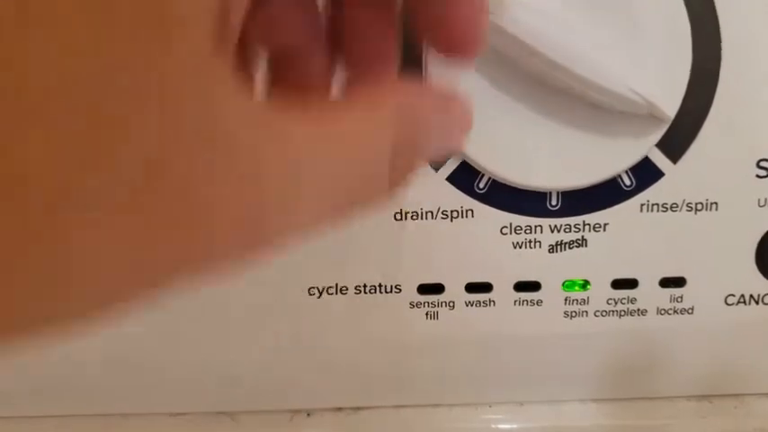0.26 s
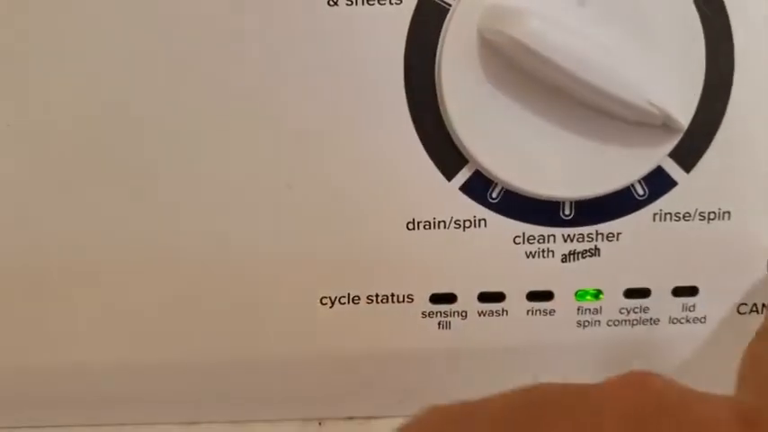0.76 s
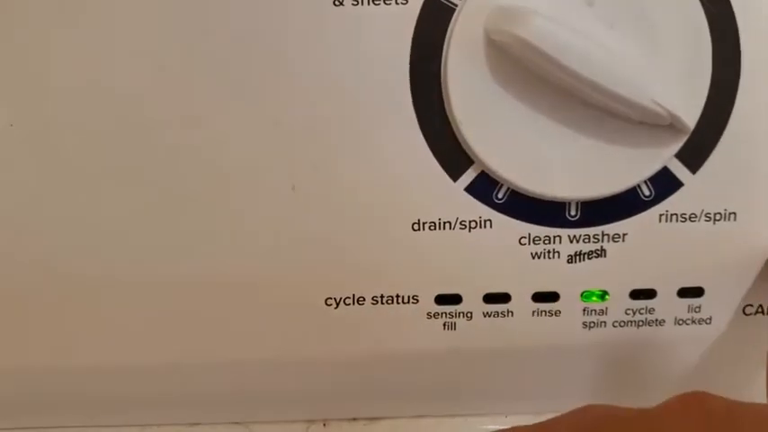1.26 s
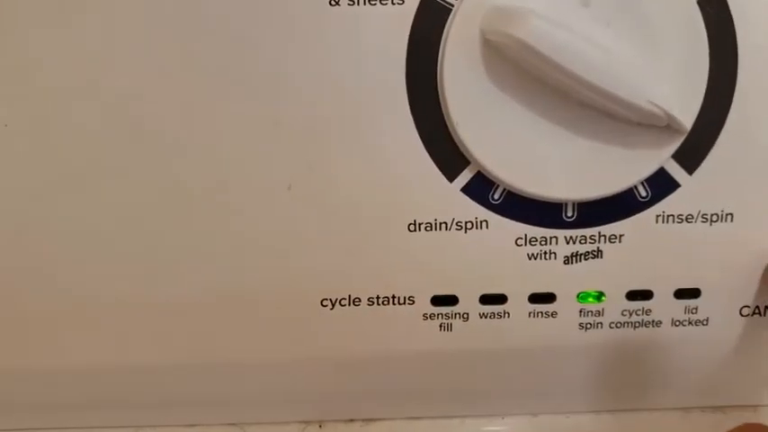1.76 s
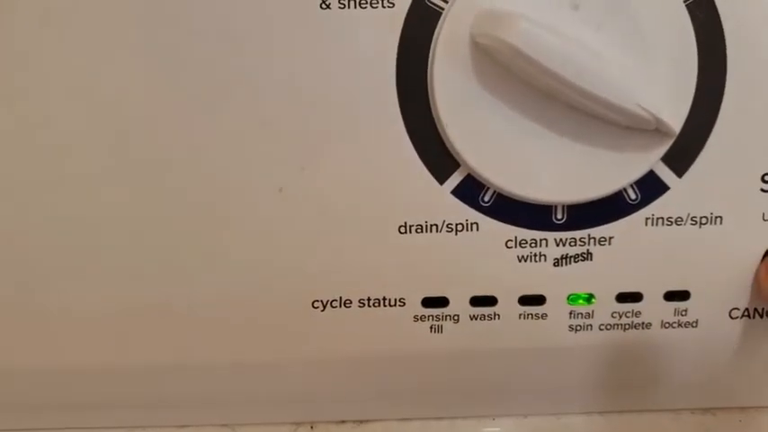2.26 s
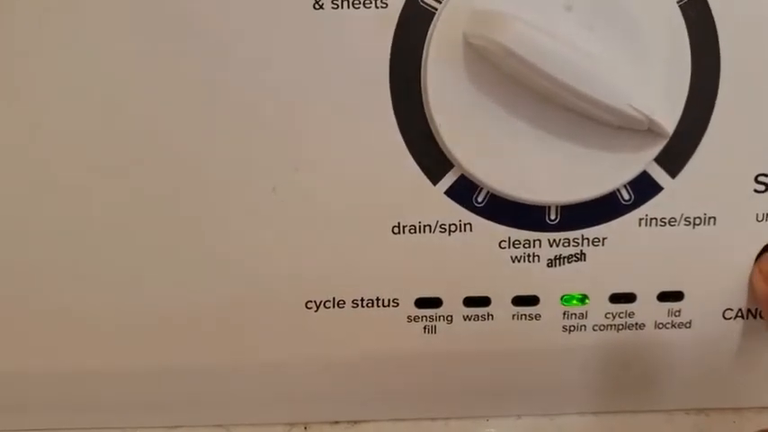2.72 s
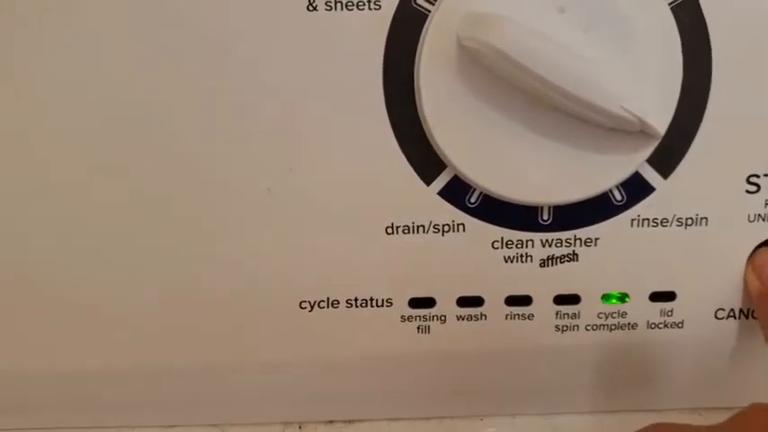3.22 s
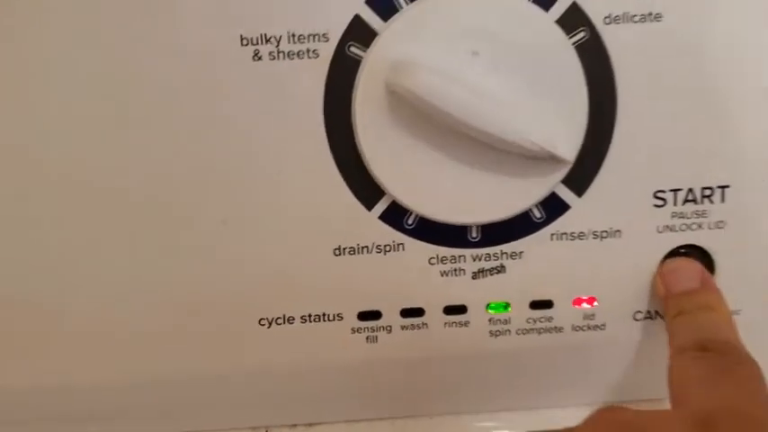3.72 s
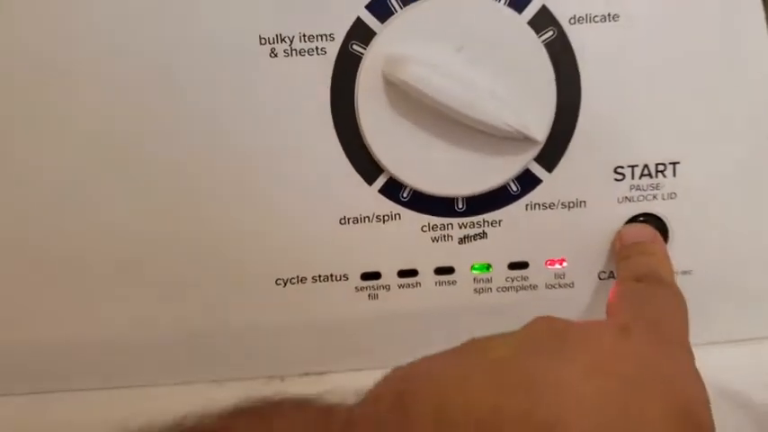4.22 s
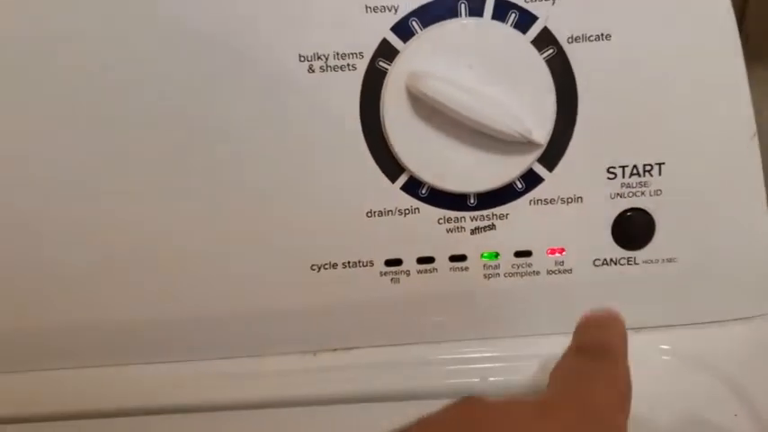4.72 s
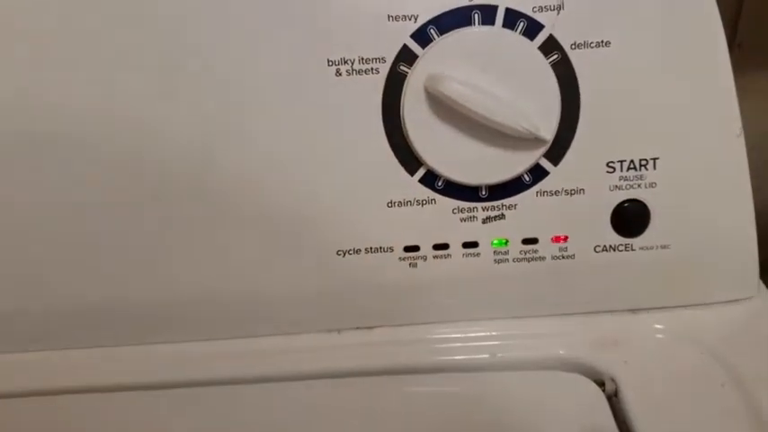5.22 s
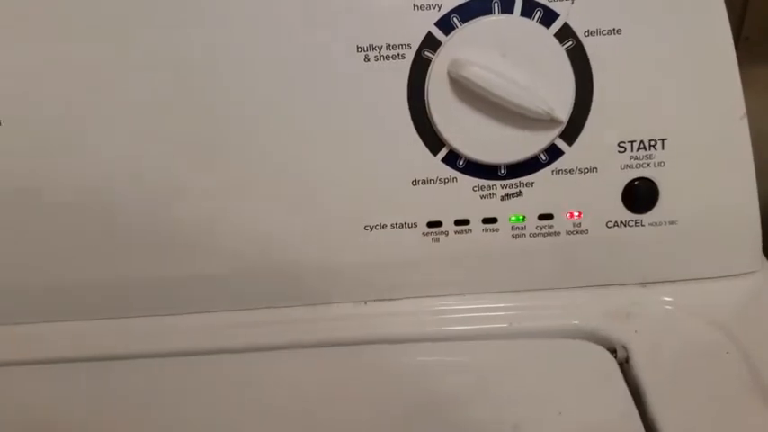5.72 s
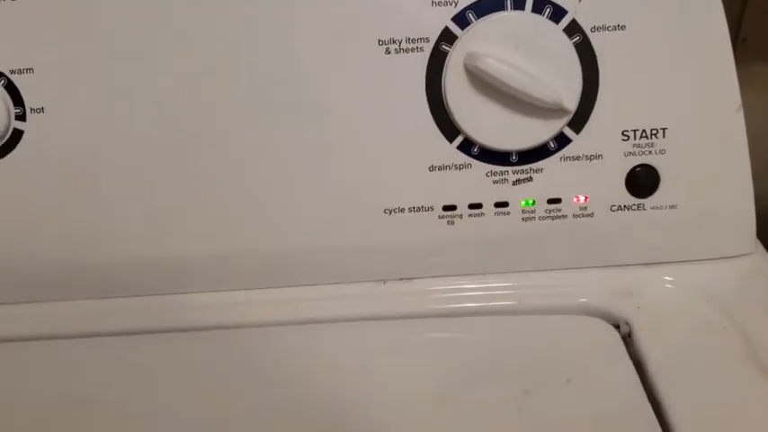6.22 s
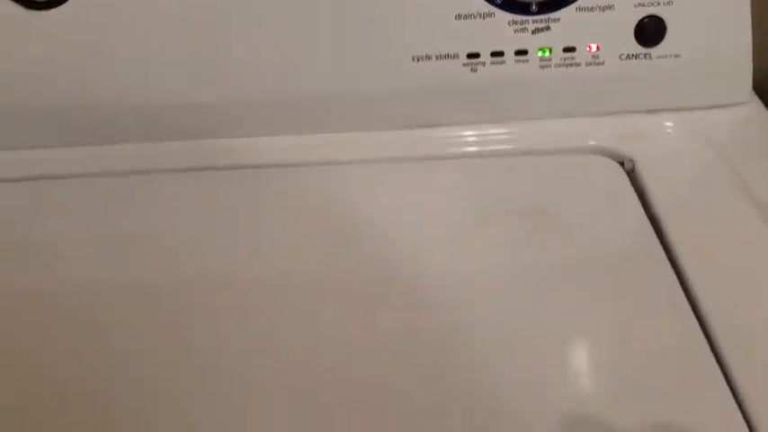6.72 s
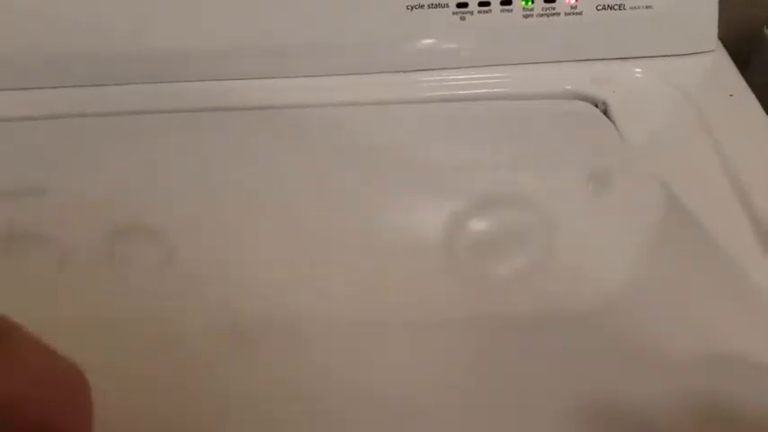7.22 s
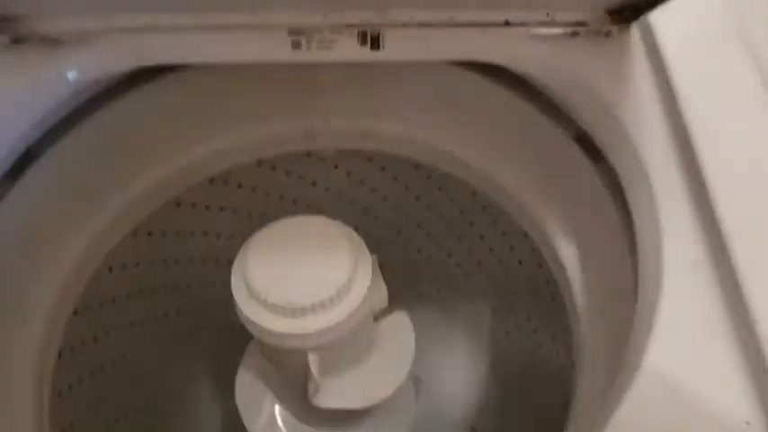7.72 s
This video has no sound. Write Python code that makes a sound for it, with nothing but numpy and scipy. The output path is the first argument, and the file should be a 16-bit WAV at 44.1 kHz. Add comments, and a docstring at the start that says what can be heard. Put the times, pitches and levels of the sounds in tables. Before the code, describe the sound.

A washing machine hums steadily, its lid lock snaps with a hard metallic clack, then water sprays into the steel tub, growing loud and spattering.

```python
"""A top-loading washer in a small hard-walled laundry, heard at the two microphone ports of a handheld phone.
Mains hum, a fan tone and a thin whine are sines; air rumble, hiss, soft knocks and swishes are shaped noise.
The lid lock snaps as noise bursts with ringing modes, and the drone sinks a little. Then the inlet valve opens:
water sprays and spits as flickering noise bands and short bursts, the steel tub drums through resonances,
water sloshes as swelling noise and the valve whistles through narrow peaks."""
import sys
import numpy as np
from scipy import signal
from scipy.fft import rfft, irfft, next_fast_len
from scipy.io import wavfile

SR = 44100
rng = np.random.default_rng(int(sys.argv[2]) if len(sys.argv) > 2 else 0)


def persist_wave(psi):
    """Save psi, clipped to +-1, as 16-bit WAV."""
    counts = np.round(np.clip(psi, -1, 1) * 32767).astype(np.int16)
    wavfile.write(sys.argv[1], SR, np.atleast_2d(counts).T)


N = 351477

LEFT_LAG = 14  # samples by which the left port hears the machine later

# Standing waves of the small room: a fine fixed ripple over frequency, another at each port.
ROOM_SIZE, ROOM_T60_S = 32768, 0.12
ROOM_DECAY = np.exp(-np.log(1000) * np.arange(ROOM_SIZE) / SR / ROOM_T60_S)
ROOM = rfft(rng.standard_normal((2, ROOM_SIZE)) * ROOM_DECAY)

# Level of the machine's drone as the phone moves. Each row: time in seconds, level of the hum in dB.
DRONE_LEVEL = [(0, -29.5), (1, -28.5), (2, -29), (3.2, -28), (3.27, -31.5), (3.5, -33.5), (3.85, -31.5),
               (4.3, -34), (4.6, -33.5), (5.06, -34), (5.7, -33), (6.5, -30.5), (7.0, -35.5), (7.33, -32),
               (7.55, -36.5), (7.97, -38.5)]

# The water jet; its first row is when the valve opens. Each row: time in seconds, spray level in dB,
# treble lift of the spray in dB (only its swing about the mean is heard), tub drumming level in dB.
JET = [(4.38, -64, -20, -55), (4.55, -49.5, 4, -51.5), (4.86, -41, 4, -40), (4.95, -47, 7, -52),
       (5.3, -42, 1, -54), (5.4, -46, 7, -40), (5.7, -47, 11.5, -42.5), (6.0, -43.5, 8.5, -32.5),
       (6.35, -44.5, 11.5, -37.5), (6.65, -44.5, 7.5, -35.5), (6.9, -46, 12.5, -33.5), (7.17, -45, 4, -35),
       (7.4, -39.5, 3, -33.5), (7.6, -40, 11, -34.5), (7.75, -37.5, 7, -39.5), (7.97, -39.5, 12, -33.5)]


def from_db(db):
    """Decibels to gain."""
    return 10 ** (np.asarray(db) / 20)


def rms_one(x):
    """Scales to rms 1."""
    return x / np.sqrt(np.mean(x ** 2) + 1e-20)


def in_time(rows):
    """Draws each column of a table as a line over time, one value per sample."""
    s, *columns = np.transpose(rows)
    return [np.interp(np.arange(N) / SR, s, column) for column in columns]


def at_hz(points, hz):
    """Reads a table of (Hz, value) on a log-frequency axis."""
    table_hz, values = np.array(points).T
    return np.interp(np.log(hz), np.log(table_hz), values)


def colour(points):
    """Turns a table of (Hz, dB) into a gain for each frequency."""
    return lambda hz: from_db(at_hz(points, hz))


def hump(centre_hz, octaves):
    """Bell-shaped gain on a log-frequency axis."""
    return lambda hz: np.exp(-0.5 * (np.log2(hz / centre_hz) / octaves) ** 2)


def drift(rate_hz):
    """Smooth random wander of rms 1: noise through two equal low-pass poles, run at every 40th sample."""
    step = 40
    r = np.exp(-2 * np.pi * rate_hz * step / SR)
    settle = 2000
    noise = rng.standard_normal(N // step + settle + 2)
    slow = signal.lfilter([1], [1, -2 * r, r * r], noise)[settle:]
    return np.interp(np.arange(N) / step, np.arange(len(slow)), rms_one(slow))


def room_gain(hz):
    """Direct sound plus the room's resonances, which fade in over the octave above 300 Hz."""
    grid = np.arange(ROOM.shape[1]) * SR / ROOM_SIZE
    share = 0.5 * np.clip(np.log2(hz / 300), 0, 1)
    ripple = np.abs(ROOM) / np.sqrt(np.mean(np.abs(ROOM) ** 2))
    return np.array([1 - share + share * np.interp(hz, grid, r) for r in ripple])


def port_noise(size):
    """Room-tinted noise: a common part, late at the left port, plus a diffuse part of each port's own."""
    # Each row: frequency in Hz, share of the noise power common to both ports (0 to 1).
    likeness = [(25, .97), (60, 0.88), (250, 1), (600, 0.72), (1500, 0.063), (8000, 0.028)]
    padded = next_fast_len(size)
    common, left, right = rfft(rng.standard_normal((3, padded)))
    hz = np.arange(len(common)) * SR / padded + 1
    alike = np.clip(at_hz(likeness, hz), 0, 1)
    late = np.exp(-2j * np.pi * hz * LEFT_LAG / SR)
    shared = np.sqrt(alike) * common * [late, late ** 0]
    diffuse = np.sqrt(1 - alike) * np.array([left, right])
    return irfft((shared + diffuse) * room_gain(hz), padded)[:, :size]


def coloured(x, gain_at):
    """Shapes noise by a gain for each frequency; rms 1."""
    size = x.shape[1]
    padded = next_fast_len(size)
    hz = np.arange(padded // 2 + 1) * SR / padded + 1
    shaped = irfft(rfft(x, padded) * gain_at(hz), padded)
    return rms_one(shaped[:, :size])


def resonance(x, hz, width_hz):
    """Two-pole resonance whose peak gain is about 1."""
    r = np.exp(-np.pi * width_hz / SR)
    poles = [1, -2 * r * np.cos(2 * np.pi * hz / SR), r * r]
    return signal.lfilter([(1 - r * r) / 2, 0, (r * r - 1) / 2], poles, x)


def burst(gain_at, t60, rise_s, bend=1, size=12288):
    """Noise that swells in rise_s and is 60 dB down at t60; bend over 1 holds longer, then falls faster."""
    t = np.arange(size) / SR
    noise = coloured(port_noise(size), gain_at) / 2  # halved, so that peaks come near 1
    return noise * (1 - np.exp(-t / rise_s)) * from_db(-60 * (t / t60) ** bend)


def add(out, s, sound):
    """Mixes a short sound in at time s."""
    at = round(s * SR)
    out[:, at:at + sound.shape[1]] += sound[:, :N - at]


def pan(db):
    """Gains for the two ports, left minus right in dB."""
    return from_db([[db / 2], [-db / 2]])


def tone(hz, phase):
    """A sine of rms 1 at both ports, later at the left."""
    t = (np.arange(N) - np.array([[LEFT_LAG], [0]])) / SR
    return np.sqrt(2) * np.sin(2 * np.pi * hz * t + phase)


def hum():
    """Magnetic hum: a harmonic series on twice the mains frequency."""
    # Each row: multiple of the hum frequency, level in dB re the drone level.
    harmonics = [(1, 0), (2, -14), (3, -30.5), (4, -25.5), (6, -33.5)]
    hum_hz = 119.74
    level_db, = in_time(DRONE_LEVEL)
    series = sum(from_db(db) * tone(k * hum_hz, rng.uniform(0, 2 * np.pi)) for k, db in harmonics)
    return from_db(level_db) * series


def fan():
    """Fan tone: a sine wavering slightly in level and phase, following the drone level."""
    level_db, = in_time(DRONE_LEVEL)
    waver_db = 0.62 * drift(2.8)
    return from_db(level_db - 13.5 + waver_db) * tone(268, 0.44 * drift(0.46))


def rumble():
    """Air rumble: low-weighted noise that takes the whole swing of the drone level."""
    # Each row: frequency in Hz, relative density in dB per Hz.
    rumble_colour = [(13, -44), (22, -28.5), (69, -2), (97, -20), (124, -7), (148, -11.5), (183, -23),
                     (256, -16), (290, -23), (317, -24), (476, -28.5), (538, -35), (714, -30), (1130, -50),
                     (1500, -38), (1950, -66), (3300, -120)]
    level_db, = in_time(DRONE_LEVEL)
    start_db = -35.5
    noise = coloured(port_noise(N), colour(rumble_colour))
    return from_db(start_db + level_db - level_db[0]) * noise


def hiss():
    """Broad hiss: shaped noise that takes about half the swing of the drone level."""
    # Each row: frequency in Hz, relative density in dB per Hz.
    hiss_colour = [(400, -2.5), (700, -6), (970, 1), (1300, -9.5), (1500, -5), (2000, -8.5), (3200, -10.5),
                   (5000, -16), (7700, -18), (9100, -22.5), (12000, -17), (15700, -14)]
    level_db, = in_time(DRONE_LEVEL)
    start_db, follows = -49, 0.51
    noise = coloured(port_noise(N), colour(hiss_colour))
    return from_db(start_db + follows * (level_db - level_db[0])) * noise


def whine():
    """Thin high sine, unsteady in level and phase, that holds its mean level and then fades."""
    fade_start_s, fade_db_per_s = 1.65, 7
    fade_db = fade_db_per_s * np.maximum(np.arange(N) / SR - fade_start_s, 0)
    return from_db(-69.5 - fade_db + 3.4 * drift(6.0)) * tone(3118, 0.38 * drift(4.6))


def swishes():
    """Brief thin swishes: puffs of treble noise."""
    # Each row: start in seconds, peak level in dB (approximate), centre in Hz, width in octaves,
    # t60 in seconds.
    puffs = [(.2, -52.5, 6000, 0.49, 0.28), (1.501, -47.5, 6160, .15, 0.18), (1.5, -52, 12000, 0.22, 0.22),
             (3.682, -47.5, 4700, 0.99, 0.9), (4.118, -46.5, 7900, 1, 0.15)]
    out = np.zeros((2, N))
    for s, db, hz, octaves, t60 in puffs:
        add(out, s, from_db(db) * burst(hump(hz, octaves), t60, rise_s=0.0013, bend=1.8))
    return out


def knocks():
    """Soft knocks: bursts of noise around one centre each, mostly dull."""
    # Each row: start in seconds, peak level in dB (approximate), centre in Hz, width in octaves,
    # t60 in seconds.
    bumps = [(0.625, -39, 800, 0.71, 0.12), (0.933, -35.5, 579, 0.75, 0.26), (1.234, -37, 577, 0.4, 0.14),
             (1.758, -29.5, 560, 0.73, 0.08), (1.818, -34.5, 750, 1, 0.2), (2.383, -35, 953, 0.81, 0.22),
             (2.534, -37, 930, 0.7, 0.32), (2.968, -37.5, 1200, 0.27, 0.17),
             (3.047, -29.5, 1000, 0.61, 0.068), (3.507, -41.5, 1180, 0.45, 0.22),
             (3.789, -34.5, 693, 1, 0.14), (4.13, -36.5, 610, 1, 0.1), (4.331, -35, 724, 0.15, 0.085),
             (4.734, -36, 2350, 0.66, 0.29), (5.885, -31, 900, 0.88, 0.32), (6.852, -23.5, 770, 0.4, 0.18),
             (7.445, -28, 638, 0.33, 0.086), (7.668, -32, 1100, 0.65, 0.066)]
    out = np.zeros((2, N))
    for s, db, hz, octaves, t60 in bumps:
        add(out, s, from_db(db) * burst(hump(hz, octaves), t60, rise_s=0.0029, bend=1.3))
    return out


def lid_lock():
    """A solenoid bolt hits its stop: a broad crack spreading through the sheet metal, and short rings."""
    # Coil tick, bolt and rebound. Each row: start in seconds, peak level in dB (approximate),
    # t60 of the crack in seconds.
    strikes = [(3.224, -28, 0.087), (3.2294, -8, 0.22), (3.283, -16.5, 0.15)]
    # Colour of the crack. Each row: frequency in Hz, relative density in dB per Hz.
    crack_colour = [(210, -39), (350, -23), (445, -8.5), (664, -14), (730, -20), (817, -10), (1380, -8),
                    (1650, -1), (2130, -7.5), (2420, -3.5), (3450, -7.5), (5940, -4.5), (12000, -6.5),
                    (15700, -6.5)]
    # Rings of the metal. Each row: frequency in Hz, level in dB re the strike, t60 in seconds.
    modes = [(700, -29, 0.068), (1215, -20, 0.051), (1604, -21.5, 0.18), (2300, -36, .08),
             (3010, -14, 0.12), (4320, -18.5, 0.2), (5020, -12, 0.05), (5980, -10, .05)]
    out = np.zeros((2, N))
    t = np.arange(8192) / SR
    for s, db, t60 in strikes:
        add(out, s, from_db(db) * burst(colour(crack_colour), t60, rise_s=0.0012, bend=1.29))
        for hz, mode_db, ring_s in modes:
            phase = rng.uniform(0, 2 * np.pi, (2, 1))
            decay = from_db(db + mode_db - 60 * t / ring_s)
            add(out, s, decay * np.sin(2 * np.pi * hz * t + phase))
    return out


def splashes():
    """Small splashes: a gain that jumps at random moments and dies back to 1."""
    step = 32  # samples
    per_s, decay_s, mean_jump = 25, 0.011, 0.43
    count = N // step + 1
    hits = (rng.random(count) < per_s * step / SR) * rng.exponential(1, count)
    dying = signal.lfilter([1], [1, -np.exp(-step / SR / decay_s)], hits)
    return 1 + mean_jump * np.repeat(dying, step)[:N]


def spray():
    """Dense droplets in bands a third of an octave wide that flicker partly together, partly alone."""
    # Each row: frequency in Hz, relative level of the band there in dB.
    spray_colour = [(1000, -34), (1700, 1.5), (2120, -10), (2560, 2), (3960, 1.5), (7710, -0.5),
                    (9060, -12.5), (15100, -14), (16000, -4), (16500, -47)]
    spray_db, treble_db, _ = in_time(JET)
    patchy_db, grain_db, grain = 2.0, 0.5, 64  # grain: samples for each drop size
    drops = from_db(grain_db * np.minimum(rng.exponential(1, N // grain + 1), 5))  # uneven drop sizes
    rough = np.repeat(drops, grain)[:N]
    white = [port_noise(N) * rough, port_noise(N) * rough]  # neighbouring bands use different noise
    together = drift(14)
    edges = 1400 * 2 ** (np.arange(12) * 0.35)
    out = np.zeros((2, N))
    for k, (low, high) in enumerate(zip(edges, edges[1:])):
        hz = np.sqrt(low * high)
        if k % 3 == 0:  # up to three neighbouring bands splash together
            spatter = splashes()
        sos = signal.butter(2, [low, high], "band", fs=SR, output="sos")
        band = signal.sosfilt(sos, white[k % 2])
        treble_share = np.clip(np.log2(hz / 6000), 0, 1)
        lift_db = treble_share * (treble_db - np.mean(treble_db))
        flicker_db = patchy_db * (together / 2 + drift(4.2))
        out += from_db(at_hz(spray_colour, hz) + lift_db + flicker_db) * spatter * band
    return from_db(spray_db) * rms_one(out)


def tub_drumming():
    """The steel tub drummed by the jet: lumpy noise excites its low modes, each filtered twice."""
    # Each row: frequency in Hz, width of the first filter in Hz (the second is twice as wide),
    # filter gain in dB.
    tub_modes = [(149, 13, -7), (229.2, 26, -7), (265.8, 32, 0), (314.3, 10.5, 0.5), (372.5, 37, -13),
                 (439, 40, -22.5), (653, 6.7, -14)]
    tub_db = in_time(JET)[2]
    jet = port_noise(N) * from_db(1.7 * drift(7.4))  # the jet lands in lumps
    tub = 0
    for hz, width_hz, db in tub_modes:
        narrow = resonance(jet, hz, width_hz)
        tub = tub + from_db(db) * resonance(narrow, hz, 2 * width_hz)
    return from_db(tub_db) * pan(2) * rms_one(tub)


def sloshing(noise):
    """Water sloshing in the tub: mid-band noise that swells as the water gathers."""
    # Each row: frequency in Hz, relative density in dB per Hz.
    slosh_colour = [(350, -3), (500, -8.5), (720, -6), (1000, -11), (1300, -12), (1900, -11.5),
                    (2600, -23.5)]

    def gain_at(hz):
        """The slosh colour, cut by 40 dB beyond 1.5 octaves from 950 Hz."""
        outside = np.abs(np.log2(hz / 950)) > 1.5
        return from_db(at_hz(slosh_colour, hz) - 40 * outside)

    open_s, rise_db_per_s = JET[0][0], 4
    swell_db = rise_db_per_s * (np.arange(N) / SR - open_s)
    return from_db(-56.5 + swell_db + 3.04 * drift(12)) * coloured(noise, gain_at)


def echoed(gain_at):
    """Adds to a colour the comb of one near echo off the tub wall, at a random lag."""
    lag_s, strength = rng.uniform(0.000394, 0.001625), 0.54
    return lambda hz: gain_at(hz) * np.abs(1 + strength * np.exp(2j * np.pi * hz * lag_s))


def spits():
    """Trapped air bursts from the inlet: a crack on the steel, a body and a fine top, ragged as drops break up."""
    # Each row: start in seconds, crack level in dB, body centre in Hz, body width in octaves,
    # body level in dB, fine top level in dB, body t60 in seconds. Levels are approximate peaks,
    # those of body and top before the raggedness.
    air_bursts = [(4.4095,-39,7700,1,-37,-32,0.15),(4.481,-42,2970,.5,-55,-39,0.14),(4.536,-48,5770,0.38,-38,-43,0.72),(4.585,-33,3500,0.74,-30.5,-34,0.13),
                  (4.737,-40,2650,.55,-41,-35,0.12),(4.7844,-34,3670,0.59,-36,-28,0.14),(4.812,-38,5000,.55,-32.5,-48,0.5),(4.8562,-38,5460,.5,-36,-34,.3),
                  (4.909,-37,3600,0.52,-35.5,-36,0.48),(4.9423,-26,6560,0.38,-36,-30,.2),(4.973,-36,4160,0.93,-33,-35,0.27),(5.049,-39,2940,.5,-45,-29,0.18),
                  (5.144,-39,5600,.5,-41,-33.5,0.2),(5.215,-43,3240,0.84,-33.5,-37,0.15),(5.29,-38,7300,0.95,-30,-48,.3),(5.382,-41,7850,0.95,-34,-44,.25),
                  (5.523,-25,5960,0.79,-28,-39,0.22),(5.663,-38,7650,.4,-36,-34,0.13),(5.7518,-38,7740,0.21,-37,-32,0.083),(5.934,-36,5900,0.47,-36,-27,0.17),
                  (6.018,-36,4900,0.44,-32,-28,.16),(6.121,-36,5200,.55,-35.5,-28,0.27),(6.1755,-35,5900,0.4,-34,-29,0.1),(6.215,-14.5,5100,0.65,-24,-35,.21),
                  (6.315,-35,7980,0.65,-33,-29,0.15),(6.3493,-32,4550,0.44,-34.5,-33.5,0.14),(6.434,-37,5420,.5,-47,-31,.23),(6.47,-50,6300,0.7,-33.5,-40,0.16),(6.483,-33,3740,0.41,-38,-29,0.19),
                  (6.5505,-30,8190,0.4,-36,-24,0.1),(6.614,-29,3860,0.77,-29,-29,0.16),(6.65,-39,4470,0.95,-32,-34,0.32),(6.69,-36,3750,0.47,-36.5,-31,0.34),
                  (6.74,-35,7510,0.56,-36.5,-33,.18),(6.819,-34,4600,1,-30,-28,0.17),(6.967,-38,8350,.6,-32,-34,0.29),(6.997,-33,6250,.5,-39,-25.5,0.16),
                  (7.0356,-29,2520,0.54,-45,-25,0.13),(7.0645,-33,3620,.43,-32,-25,0.2),(7.0887,-15,7660,0.39,-33,-24,0.14),(7.201,-21,4100,.55,-42,-31,0.21),
                  (7.229,-33,8350,0.67,-33,-28,.15),(7.265,-20,6600,0.52,-34,-23.5,0.17),(7.3088,-29,7000,0.95,-28.5,-27,0.3),(7.367,-30,5330,0.4,-35,-25,0.19),
                  (7.4347,-27,7500,.55,-35,-26,0.4),(7.4455,-26,5250,0.96,-19,-21,0.13),(7.507,-28,7600,0.63,-26,-24.5,0.19),(7.564,-28,7800,0.14,-28,-24,0.14),
                  (7.605,-21,7570,1,-25,-26,0.43),(7.6673,-8,7400,1,-20,-19,0.11),(7.688,-7,6100,0.81,-24,-23,0.1),(7.7255,-6,8300,0.22,-26,-16.5,0.15),
                  (7.763,-19,3760,0.42,-27,-29.5,0.1),(7.793,-26,3180,0.2,-39,-26,0.22),(7.832,-18,8450,0.24,-22.5,-18.5,0.081),(7.87,-28,2680,0.4,-43,-24.5,0.2),
                  (7.898,-26,5000,0.56,-26.5,-28,0.064),(7.939,-30,6000,0.86,-27,-27.5,0.099)]
    top_hz, top_octaves, top_lasts = 14470, 0.42, 0.87  # the fine top dies sooner than the body
    water, cracks = np.zeros((2, 2, N))
    for s, crack_db, hz, octaves, body_db, top_db, t60 in air_bursts:
        body = burst(echoed(hump(hz, octaves)), t60, rise_s=0.00027, bend=1.41)
        add(water, s, from_db(body_db) * body)
        top = burst(hump(top_hz, top_octaves), top_lasts * t60, rise_s=0.00037, bend=1.45, size=8192)
        add(water, s, from_db(top_db) * top)
        crack_hz = hz if body_db > top_db else top_hz  # coloured like the stronger part
        crack = burst(hump(crack_hz, 0.12), t60=0.018, rise_s=0.00021, size=4096)
        add(cracks, s, from_db(crack_db) * crack)
    return water * from_db(1.08 * drift(90)) + cracks


def valve_whistle(noise):
    """The valve whistles: noise through narrow resonances, each filtered twice, faded in and out."""
    # Frequencies of the resonances in Hz.
    valve_hz = (1612, 1480, 2350)
    # One row for each frequency: width of each filter in Hz, filter gain in dB.
    valve_peaks = [(22, 9), (30, 5), (60, -28)]
    # Each row: start in seconds, end in seconds, level in dB.
    whistles = [(4.62, 5.56, -57), (7.66, 7.9, -51)]
    t, edge_s = np.arange(N) / SR, 0.017
    valve = 0
    for hz, (width_hz, db) in zip(valve_hz, valve_peaks):
        narrow = resonance(noise, hz, width_hz)
        valve = valve + from_db(db) * resonance(narrow, hz, width_hz)
    level = np.zeros(N)
    for start_s, end_s, db in whistles:
        level += from_db(db) * np.clip(np.minimum(t - start_s, end_s - t) / edge_s, 0, 1)
    return level * from_db(2.3 * drift(15.0)) * rms_one(valve)


def fill():
    """The inlet valve opens within 41 ms on spray, drumming, slosh and whistle; the spits come on top."""
    is_open = np.clip((np.arange(N) / SR - JET[0][0]) / 0.041, 0, 1)
    steady = port_noise(N)  # one flow noise for slosh and whistle
    water = spray() + tub_drumming() + sloshing(steady) + valve_whistle(steady)
    return is_open * water + spits()


def scene():
    """All sources at the two ports."""
    drone = hum() + fan() + rumble() + hiss() + whine()
    return drone + swishes() + knocks() + lid_lock() + fill()


def record(dry):
    """The ports differ in colour, and a steep low-pass cuts the top."""
    # Each row: frequency in Hz, left minus right in dB.
    port_lean = [(60, 1), (110, 1), (250, -2), (640, -1.5), (1000, -5), (1600, -4.5), (3100, -4.5),
                 (5000, -3), (8000, 1), (15000, 2)]
    size = next_fast_len(N + 4096)
    hz = np.arange(size // 2 + 1) * SR / size + 1
    half_db = at_hz(port_lean, hz) / 2
    ports = irfft(rfft(dry, size) * from_db([half_db, -half_db]), size)[:, :N]
    low_pass = signal.ellip(12, 0.5, 70, 15720, fs=SR, output="sos")
    return signal.sosfilt(low_pass, ports)


dry = scene()
out = record(dry)
persist_wave(out)
```